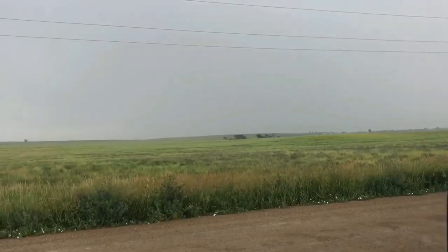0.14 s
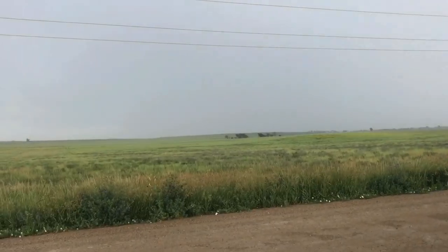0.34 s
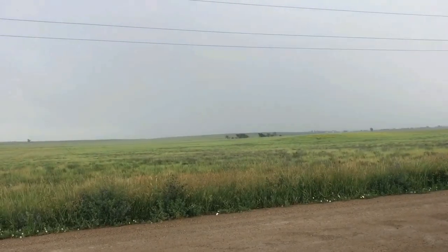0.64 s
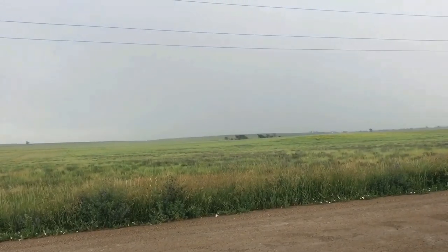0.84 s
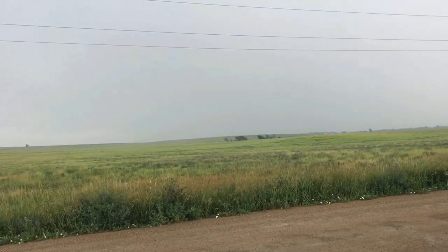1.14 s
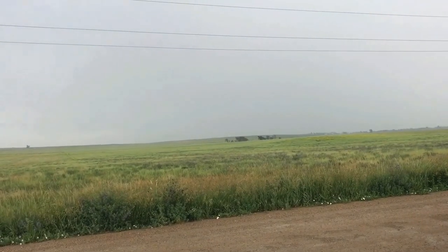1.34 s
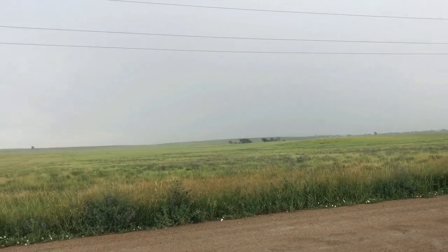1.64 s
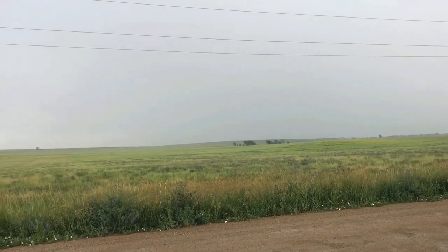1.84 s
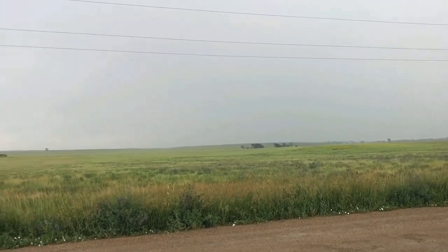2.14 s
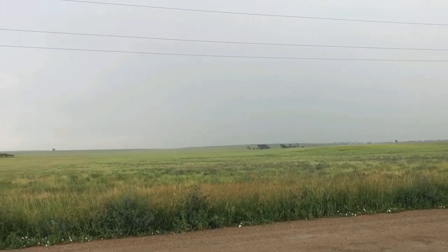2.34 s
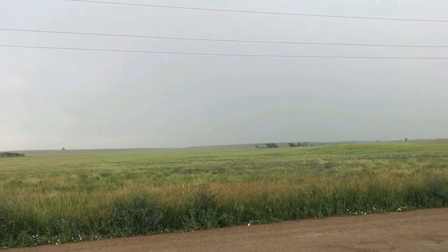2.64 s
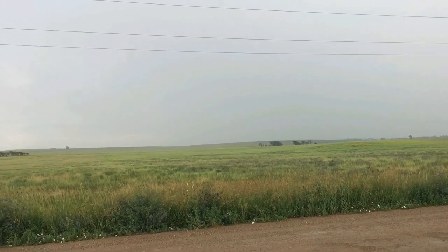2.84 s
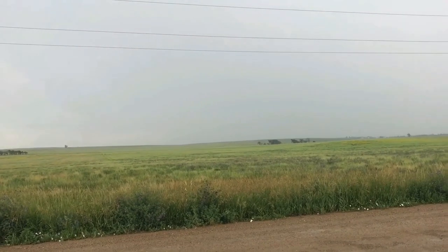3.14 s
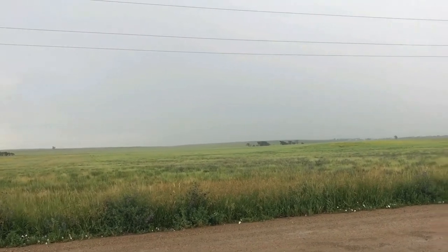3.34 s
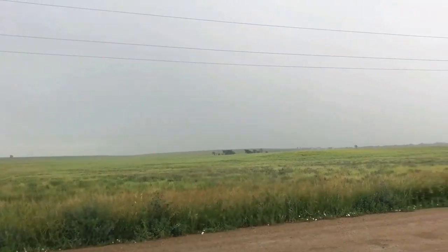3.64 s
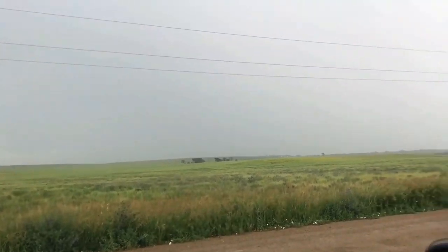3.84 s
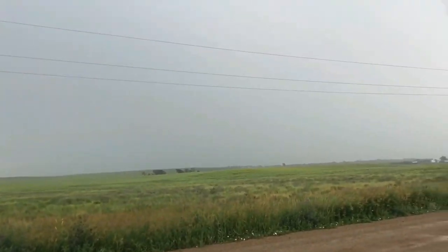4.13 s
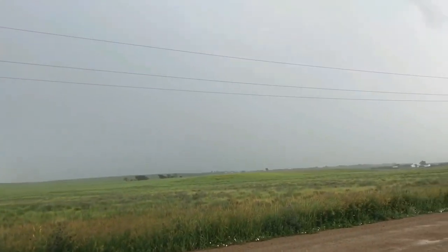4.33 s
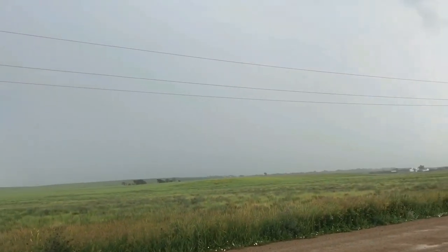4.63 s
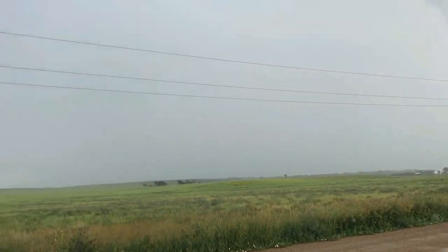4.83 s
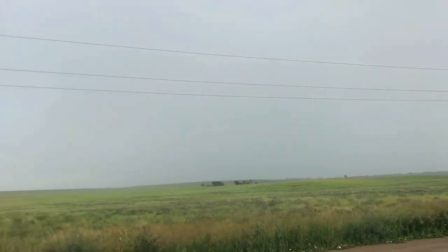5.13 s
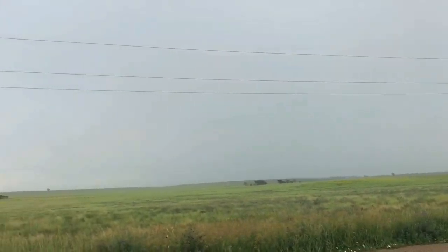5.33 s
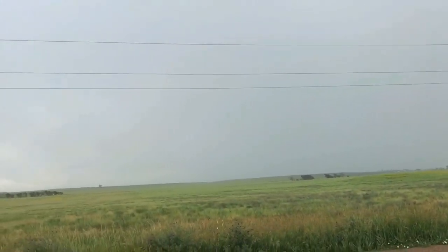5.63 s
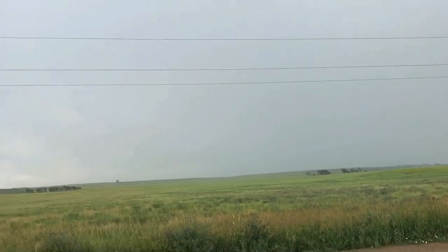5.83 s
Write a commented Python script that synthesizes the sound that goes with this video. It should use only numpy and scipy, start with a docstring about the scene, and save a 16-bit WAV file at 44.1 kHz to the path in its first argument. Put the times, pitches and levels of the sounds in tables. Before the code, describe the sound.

Loud close thunder breaks over a roadside field, cracking hard enough to overload the microphone, then rumbling unevenly with repeated bangs among faint raindrops.

```python
"""Thunder over grassland

Thunder rolls over open grassland as the first raindrops fall, heard from the roadside.
Every kink of the lightning channel sends its own shock wave: the far ones merge into a rolling rumble
of filtered random impulses, the near ones come in peals and separate bangs made of decaying impulses,
and the strongest crack sharply and overload the microphone. Raindrops are impulses with a little spray;
grass is coloured noise with faint patter, and a far insect chirps in short bursts of narrow-band noise."""
import sys
import numpy as np
from scipy import signal
from scipy.fft import rfft, irfft, next_fast_len
from scipy.io import wavfile
from scipy.ndimage import uniform_filter1d

SR = 44100
rng = np.random.default_rng(int(sys.argv[2]) if len(sys.argv) > 2 else 0)


def to_wav(s):
    """Save 16-bit WAV."""
    ch = np.atleast_2d(s).T  # columns
    pcm = np.round(np.clip(ch, -1, 1) * 32767)  # PCM
    wavfile.write(sys.argv[1], SR, pcm.astype(np.int16))


N = 263718
TIME = np.arange(N) / SR


def from_db(db):
    """Logarithmic level: 20 dB is a tenfold amplitude."""
    return 10 ** (np.asarray(db) / 20)


def rms_one(x):
    """Normalisation to unit mean power."""
    return x / np.sqrt(np.mean(x ** 2) + 1e-20)


def in_time(rows):
    """Linear interpolation over time: one curve per column after the first."""
    times, *columns = np.transpose(rows)
    return [np.interp(TIME, times, column) for column in columns]


def cut(x, kind, hz, order=2):
    """Butterworth filtering: low-, high- or band-pass, flat within the pass band."""
    sections = signal.butter(order, np.clip(hz, 10, .45 * SR), kind, fs=SR, output="sos")
    return signal.sosfilt(sections, x + 1e-18)


def coloured(x, spectrum):
    """Spectral shaping: weight each frequency by a curve over log frequency, then set unit power."""
    hz, db = np.transpose(spectrum)
    size = next_fast_len(N)
    bins = np.maximum(np.fft.rfftfreq(size, 1 / SR), 1)
    gain = from_db(np.interp(np.log(bins), np.log(hz), db))
    return rms_one(irfft(rfft(x, size) * gain, size)[:N])


def evened(x, span_s):
    """Envelope flattening: divide by the short-term rms, keeping the finer grain."""
    size = max(int(span_s * SR), 8)
    power = uniform_filter1d(uniform_filter1d(x ** 2, size), size)
    return x / np.sqrt(np.abs(power) + 1e-20)


def tilted(x, hz, treble_db):
    """Spectral tilt: raise or lower everything above a pivot frequency."""
    return cut(x, "low", hz, order=3) + from_db(treble_db) * cut(x, "high", hz, order=3)


def random_clicks(per_s, spread_db):
    """Random impulse train: independent moments and signs, most sizes small and a few large."""
    sizes = from_db(spread_db * np.minimum(rng.exponential(1, N), 4))
    signs = rng.choice([-1, 1], N)
    return sizes * signs * (rng.random(N) < per_s / SR)


def clicks(times, levels_db):
    """Impulse excitation at given moments."""
    out = np.zeros(N)
    places = np.clip(np.round(np.asarray(times) * SR).astype(int), 0, N - 1)
    np.add.at(out, places, from_db(levels_db))
    return out


def dying(hits, t60):
    """Exponential decay: jump at each impulse, then fall by 60 dB in t60 seconds."""
    return signal.lfilter([1], [1, -from_db(-60 / (t60 * SR))], hits + 1e-18)


def swing(hits, hz, t60):
    """Damped oscillation: each impulse gives compression, then suction, dying away."""
    r, w = from_db(-60 / (t60 * SR)), 2 * np.pi * hz / SR
    return signal.lfilter([0, np.sin(w)], [1, -2 * r * np.cos(w), r * r], hits + 1e-18)


# Ground echo relative to the direct wave, before dulling: (time [s], level [dB])
GROUND_ECHO_LEVEL = [(1.2, -34), (1.7, -17.5), (2.2, -3), (4.0, -10)]
# the echo comes later as the sound arrives from higher up the channel
FIRST_DELAY_S, OVERHEAD_DELAY_S, CLIMB_START_S, CLIMB_S = .0033, .008, 1.55, 1.3


def off_ground(x, dull_hz):
    """Ground reflection: a wave from above is heard directly and again, a little duller, off the road."""
    climb_left = np.exp(-np.maximum(TIME - CLIMB_START_S, 0) / CLIMB_S)
    delay = OVERHEAD_DELAY_S - (OVERHEAD_DELAY_S - FIRST_DELAY_S) * climb_left
    echo_db, = in_time(GROUND_ECHO_LEVEL)
    dulled = cut(x, "low", dull_hz, order=1)
    return x + from_db(echo_db) * np.interp(TIME - delay, TIME, dulled)


# Overall level of the grass layer: (time [s], level [dB])
GRASS_LEVEL = [(0, -55), (1, -55), (1.75, -58), (2.05, -50), (2.15, -67.5), (4, -60), (4.4, -56),
               (5.98, -58.5)]
# Colour of the hiss of wind in the grass: (frequency [Hz], relative spectral level [dB per Hz])
GRASS_SPECTRUM = [(500, -30.5), (1000, 5.5), (1500, 5), (2100, 4), (2800, 1.5), (3500, 1), (5000, -5),
                  (7000, -9.5), (10000, -11), (13000, -12.5), (16000, -13.5)]
# even chirps with a bell-shaped envelope; CHIRP_S is its half-width at 1/e, CHIRP_DB is relative to the hiss
CHIRP_FIRST_S, CHIRP_EVERY_S, CHIRP_S, CHIRP_HZ, CHIRP_DB = .101, .198, .016, 2865, -4


def grass():
    """Turbulent noise: hiss, patter and chirps sink after the loudest crack and slowly return."""
    level_db, = in_time(GRASS_LEVEL)
    hiss = coloured(rng.standard_normal(N), GRASS_SPECTRUM)
    patter = rms_one(cut(random_clicks(per_s=41, spread_db=4.5), "band", [2500, 14000]))
    # time from the nearest chirp centre
    from_chirp = (TIME - CHIRP_FIRST_S + CHIRP_EVERY_S / 2) % CHIRP_EVERY_S - CHIRP_EVERY_S / 2
    chirp_band = [CHIRP_HZ - 130, CHIRP_HZ + 130]
    trill = evened(cut(rng.standard_normal(N), "band", chirp_band), span_s=.02)
    chirps = np.exp(-(from_chirp / CHIRP_S) ** 2) * trill
    return from_db(level_db) * (hiss + from_db(-11) * patter + from_db(CHIRP_DB) * chirps)


# The steady roll under the peals: (time [s], reference level [dB], brightness [dB])
ROLL_COURSE = [(0, -38, -2.5), (.85, -36.5, -4), (1.03, -38, -5), (1.09, -18, 0), (1.4, -21.5, 0),
               (1.62, -20, 3.5), (1.84, -19, 3.5), (1.9, -18, -1), (2.09, -28.5, 1), (2.52, -28.5, -1),
               (2.85, -20, 0.5), (3.35, -21, 0), (3.7, -22.5, 0), (4.08, -24, 0), (4.4, -19.5, 1.5),
               (5.2, -22.5, -1.5), (5.98, -23, 1)]
# How depth, rumble, roar, rasp and crackle follow the roll:
# (offset from the reference level [dB], slope [dB per dB of brightness])
ROLL_BAND_LEVELS = [(-8.5, -1.35), (-2.48, -0.5), (-10, 1.7), (-16, 0.9), (-26.5, -1.2)]
# Peals, each from one stretch of the channel:
# (time of full strength [s], hold [s], reference level [dB], bass offset [dB], brightness [dB])
CHANNEL_PEALS = [(0.385, 0.086, -33.5, 3, -14), (0.552, 0.11, -25.5, -1, -7.5),
                 (0.938, 0.16, -32.5, 4.5, -3), (1.063, 0.042, -13.5, 6, -0.5),
                 (1.176, 0.019, -10.5, -4.5, 0.5), (1.228, .04, -17.5, 1.5, -0.5),
                 (1.477, 0.033, -24.5, -5, 5), (1.557, 0.35, -29.5, -19, 2), (1.772, 0.045, -9, 5, 3),
                 (1.92, 0.032, -18, -2, 3.5), (1.956, 0.011, -11.5, 5.5, 7),
                 (2.019, 0.0079, -9.5, 5.5, 1.5), (2.135, 0.027, -40.5, 12, 9.5),
                 (2.201, 0.019, -25.5, 5.5, 6), (2.24, 0.022, -30, -11, 4), (2.283, 0.009, -17, -22, 0),
                 (2.352, 0.025, -27, 7, 2.5), (2.419, 0.0047, -20, -0.5, 2.5),
                 (2.649, 0.025, -16, -14.5, -0.5), (2.843, 0.0068, -6, -5, 0),
                 (2.871, 0.0063, -9.5, -4, 2.5), (2.934, 0.0086, -5, -4.5, .5),
                 (2.981, 0.019, -14, -20, -4), (3.14, 0.012, -12.5, -15, -3), (3.239, 0.05, -14, 4, 1.9),
                 (3.492, 0.021, -13, -5.5, -4), (3.569, 0.026, -10, -2.5, -0.1), (3.761, 0.037, -13, -5, 0),
                 (3.837, 0.012, -13, 0.5, 1), (3.905, 0.0057, -11, 0, 2), (4.134, 0.027, -22.5, 1, -3),
                 (4.369, 0.0071, -15, -5, -1.5), (4.595, 0.04, -22, 4.5, -18), (4.68, .035, -16, -15, -6),
                 (4.923, 0.038, -25, 1, -22), (5.401, .02, -26.5, 5.5, -18), (5.808, 0.097, -18.5, -12, -8)]
# How roar, rasp and crackle follow a peal:
# (offset from the reference level [dB], slope [dB per dB of brightness])
PEAL_BAND_LEVELS = [(-12, .95), (-20, 1.8), (-29.5, 2.15)]
PEAL_LOW_T60_S, PEAL_HIGH_T60_S = 0.17, 0.1
# random surges of the roll: rms depth and the fastest rate
SURGE_DB, SURGE_HZ = 1.5, 4.86
# the air takes more of the top as the paths grow longer
CRACKLE_LOSS_DB_PER_S = 2.88


def roll_powers():
    """Power addition: the surging roll plus the peals, whose highs die sooner than their lows."""
    roll_db, bright = in_time(ROLL_COURSE)
    roll_db = roll_db + SURGE_DB * rms_one(cut(rng.standard_normal(N), "low", SURGE_HZ))
    power = from_db([roll_db + offset + slope * bright for offset, slope in ROLL_BAND_LEVELS]) ** 2
    power[-1] *= from_db(-CRACKLE_LOSS_DB_PER_S * TIME) ** 2
    for start, hold, db, bass, bright in CHANNEL_PEALS:
        lows = from_db([db + bass, db])
        highs = from_db([db + offset + slope * bright for offset, slope in PEAL_BAND_LEVELS])
        power[:2] += np.outer(lows, peal_shape(start, hold, PEAL_LOW_T60_S)) ** 2
        power[2:] += np.outer(highs, peal_shape(start, hold, PEAL_HIGH_T60_S)) ** 2
    return power


PEAL_ATTACK_S = 0.012


def peal_shape(start, hold, t60):
    """Attack and exponential decay: a peal swells quickly, holds and dies away."""
    attack = np.clip(1 + (TIME - start) / PEAL_ATTACK_S, 0, 1)
    return attack * from_db(-60 * np.clip((TIME - start - hold) / t60, 0, 3))


# Colour of the roll before its bands are levelled: (frequency [Hz], relative spectral level [dB per Hz])
THUNDER_SPECTRUM = [(15, -55.5), (28, -36), (50, -0.5), (78, 2.5), (120, -1.5), (160, .5), (210, -4.5),
                    (300, -6.5), (440, -16.5), (620, -13), (800, -21), (1400, -29.5), (2500, -35),
                    (4300, -53), (5400, -58.5), (12000, -87)]


def roll(bangs):
    """Incoherent superposition: countless shock waves from the far channel fill in around the bangs."""
    depth_db, rumble_db, roar_db, rasp_db, crackle_db = 10 * np.log10(roll_powers())
    far = off_ground(random_clicks(per_s=2000, spread_db=3.0), dull_hz=2530)
    far = coloured(far, THUNDER_SPECTRUM)
    near = off_ground(random_clicks(per_s=500, spread_db=2.0), dull_hz=3000)
    near = coloured(near, THUNDER_SPECTRUM)
    near = tilted(near, 3200, 0.45 * (crackle_db + 46.5))
    # the air dulls long paths: the weaker the next band up, the faster each band falls away
    far = tilted(far, 180, 0.55 * (roar_db - rumble_db + 10.5))
    far = tilted(far, 680, 0.7 * (rasp_db - roar_db + 10))
    far = tilted(far, 1350, 0.89 * (crackle_db - rasp_db + 23))

    def fill(waves, band_hz, level_db, span_s, order):
        """Power budget: a band's waves take what the bangs leave, but at least about half."""
        taken = uniform_filter1d(cut(bangs, "band", band_hz, order=3) ** 2, size=1100)
        power = from_db(level_db) ** 2
        left = np.maximum(power - taken, from_db(-3.0) ** 2 * power)
        return np.sqrt(left) * evened(cut(waves, "band", band_hz, order=order), span_s)

    depth = fill(far, [41, 115], depth_db - .3, span_s=0.078, order=4)
    rumble = fill(far, [110, 370], rumble_db - .1, span_s=0.03, order=3)
    roar = fill(far, [420, 850], roar_db - .2, span_s=0.054, order=4)
    rasp = fill(far, [880, 1560], rasp_db - .2, span_s=0.025, order=2)
    # only the shorter paths keep their treble
    crackle = fill(near, [1700, 8000], crackle_db - 0.3, span_s=0.065, order=3)
    return depth + rumble + roar + rasp + crackle


# Raindrops landing close by:
# (time [s], impulse level [dB], spray level relative to the impulse [dB], low-pass corner [Hz])
CLOSE_DROPS = [(0.0467, -41, -48, 14000), (0.0888, -34.5, -10, 8400), (.124, -39.5, -30, 14000),
               (.172, -43.5, -30, 14000), (.389, -25, -24, 14000), (0.547, -25.5, -10, 3130),
               (1.112, -24.5, -19, 7500), (1.4512, -27, -6, 6950), (2.872, -40, -34, 13000),
               (3.231, -45, -30, 9100), (4.61, -44, -33, 12000), (5.3245, -44, -26, 12000),
               (5.358, -42.5, -30, 16000), (5.5452, -33.5, -3, 18500), (5.8926, -42, -5, 12000)]
# smaller drops fall at random; the gain acts on their impulses
SMALL_DROPS_PER_S, SMALL_DROP_GAIN_DB = 22, -48


def raindrops():
    """Impact radiation: each drop ticks as it lands and throws a little spray; smaller ones only tick."""
    small = random_clicks(per_s=SMALL_DROPS_PER_S, spread_db=2.4)
    out = from_db(SMALL_DROP_GAIN_DB) * cut(small, "band", [2500, 15000], order=1)
    fizz = cut(rng.standard_normal(N), "high", 2600)
    for time, db, spray_db, top_hz in CLOSE_DROPS:
        hit = clicks([time], [db])
        tick = from_db(18.5) * cut(hit, "high", 1300, order=1)
        spray = from_db(spray_db) * dying(hit, t60=0.05) * fizz
        out = out + cut(tick + spray, "low", top_hz)
    return out


# Dull thuds and knocks: (time [s], relative impulse level [dB], pitch [Hz])
DULL_THUDS = [(0.387, -12.5, 215), (0.3893, -23, 905), (.635, -7.5, 413), (0.73, -19, 476),
              (.758, -20.5, 407), (1.048, -17, 600), (1.102, 7, 122), (1.299, -8.5, 570), (2.023, 8.5, 71),
              (3.003, -6, 420), (3.556, -2.5, 256), (4.144, -15, 394), (4.377, -1.5, 570),
              (4.688, -11, 273), (4.927, -5, 140)]


def thuds():
    """Heavily damped resonance: dull blows with no sharp front, a few swings at one pitch."""
    out = 0
    for time, db, hz in DULL_THUDS:
        blow = swing(clicks([time], [db - 0.5]), hz, t60=4.6 / hz)
        out = out + cut(blow, "low", 1.63 * hz, order=4)
    return out


# The clearest shock fronts, some followed a few milliseconds later by their ground echo:
# (time [s], relative front level [dB], relative boom level [dB])
SHOCK_FRONTS = [(1.0712, -28, -4), (1.1693, -19, 1), (1.1928, -26, -6), (1.7782, -17, -1), (1.7874, -15, 1),
                (1.8116, -20, -4), (1.9144, -26, -16), (1.9408, -24, -8), (1.958, -6, 0), (2.0116, -9, -1),
                (2.0247, -15, -5), (2.1986, -26, -16), (2.2894, -32, -13), (2.6606, -30, -12),
                (2.8392, -23, 0), (2.8455, -19, -3), (2.8685, -21, -5), (2.8752, -22, -3), (2.931, -26, -3),
                (2.9418, -19, 0), (3.2563, -24, -5), (3.2615, -22, -4), (3.591, -20, -2), (3.7745, -28, -5),
                (3.8349, -26, -4), (3.9009, -20, -4)]


def shocks():
    """Shock-wave propagation: a steep front, rounded by the air, and a slow swing behind it."""
    times, front_db, boom_db = np.transpose(SHOCK_FRONTS)
    fronts = cut(dying(clicks(times, front_db + 9), t60=0.0065), "high", 300, order=1)
    booms = swing(clicks(times, boom_db - 1.0), hz=188, t60=.012)
    return off_ground(cut(fronts, "low", 4700, order=6) + booms, dull_hz=6000)


# Three sharp cracks, each followed by its ground echo:
# (time [s], impulse level before gain and filtering [dB], low-pass corner [Hz])
CRACKS_AND_ECHOES = [(1.7873, -6, 5530), (1.7905, -17, 6800), (1.9573, -14, 14700), (1.9623, -7, 13000),
                     (2.011, -3.5, 15500), (2.0138, -15, 11800)]
# Colour of the wash scattered from the ground and roadside:
# (frequency [Hz], relative spectral level [dB per Hz])
SCATTER_SPECTRUM = [(500, 28), (2000, -29), (4000, 2), (7000, -9), (11000, -5), (16000, -23)]


def cracks():
    """Shock fronts and scattering: barely rounded fronts and echoes, each with a short scattered wash."""
    out = 0
    scattered = coloured(rng.standard_normal(N), SCATTER_SPECTRUM)
    for time, db, top_hz in CRACKS_AND_ECHOES:
        hit = clicks([time], [db])
        snap = from_db(7.0) * cut(dying(hit, t60=0.0042), "high", 540, order=1)
        snap = snap + from_db(1) * cut(snap, "band", [5400, 7600], order=1)
        wash = from_db(-8.0) * dying(hit, t60=0.11) * scattered
        out = out + cut(snap + wash, "low", top_hz, order=3)
    return out


def scene():
    """Linear superposition: thunder, rain and grass add at one microphone."""
    bangs = cut(shocks() + thuds(), "high", 82, order=3)
    return (bangs + roll(bangs) + cracks() + raindrops() + grass())[None]


CUTOFF_HZ = 16500


def record(dry):
    """Transducer response and saturation: a presence peak, a dip above it, rounded peaks and a cut top."""
    presence = from_db(-19.0) * cut(dry, "band", [5900, 7700], order=1)
    dip = from_db(-7.5) * cut(dry, "band", [9900, 10800], order=1)
    heard = dry + presence - dip
    rounded = heard / (1 + heard ** 6) ** (1 / 6)
    # elliptic low-pass: 0.1 dB ripple, 80 dB stop band
    return signal.sosfilt(signal.ellip(10, .1, 80, CUTOFF_HZ, fs=SR, output="sos"), rounded)


dry = scene()
out = record(dry)
to_wav(out)
```